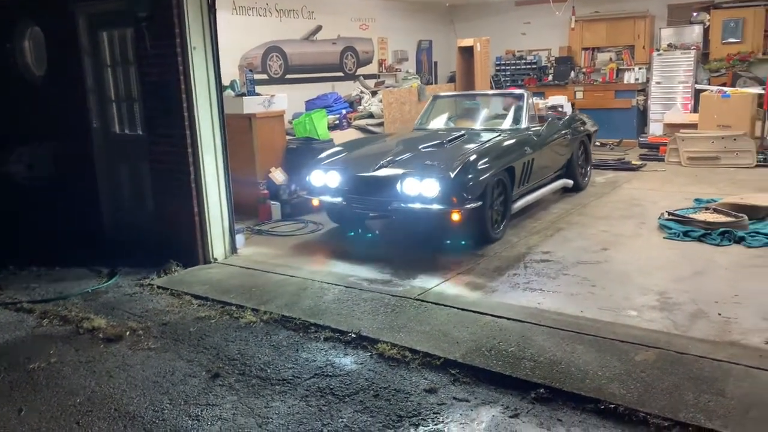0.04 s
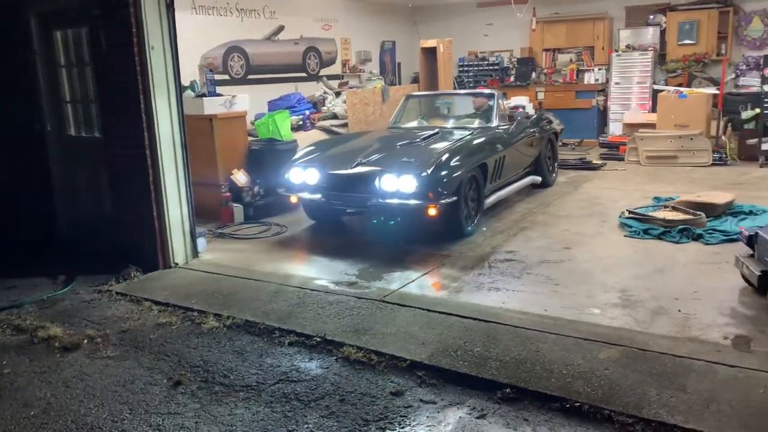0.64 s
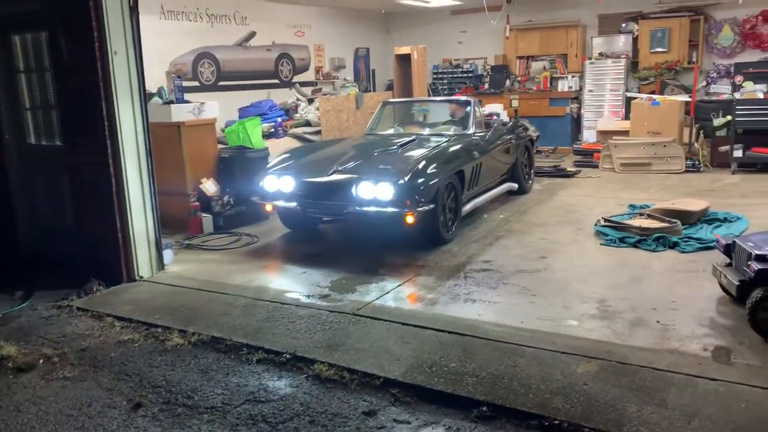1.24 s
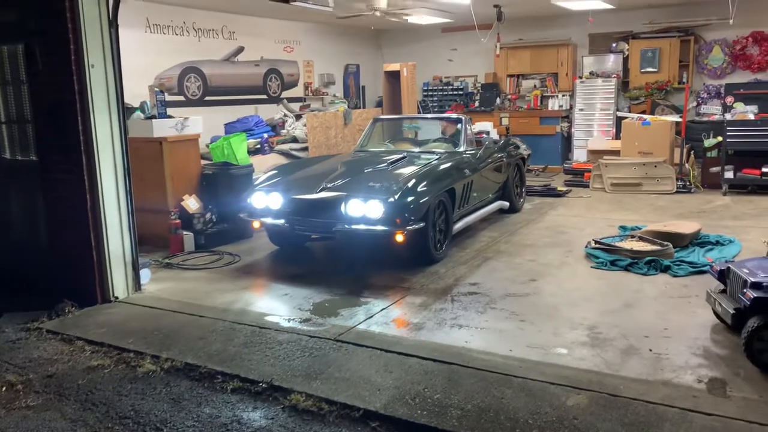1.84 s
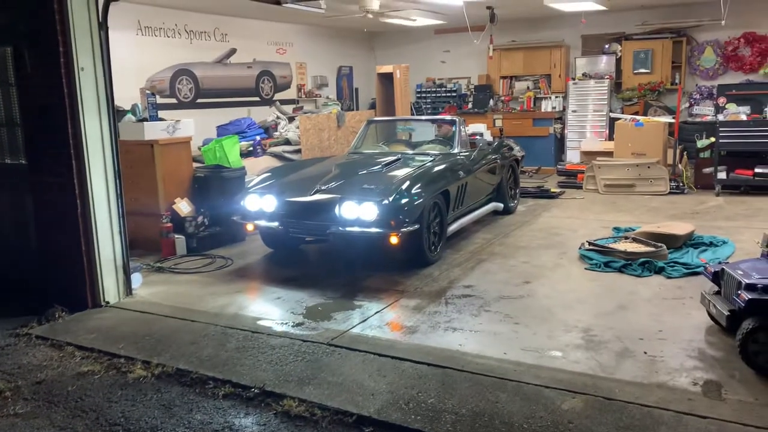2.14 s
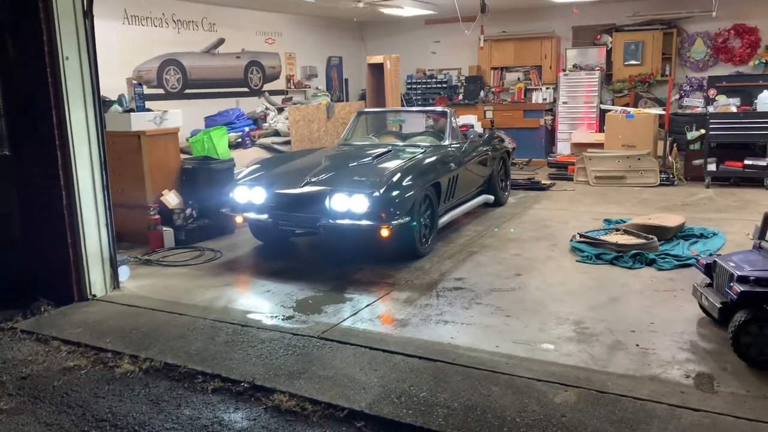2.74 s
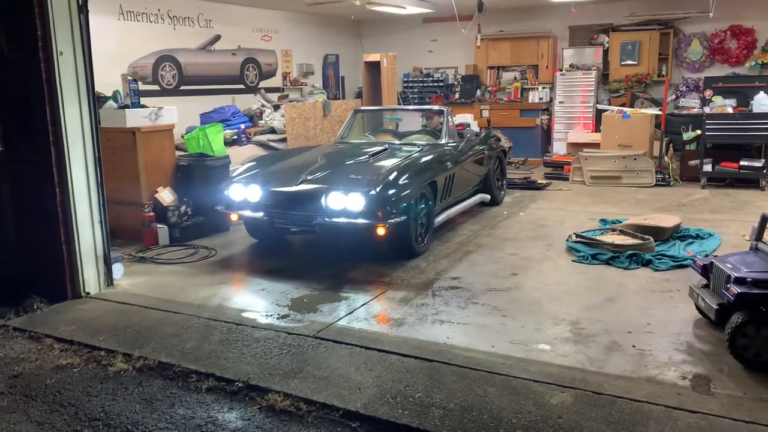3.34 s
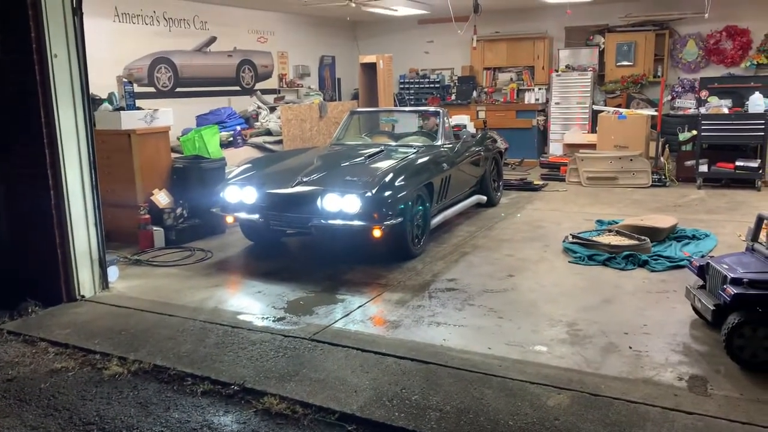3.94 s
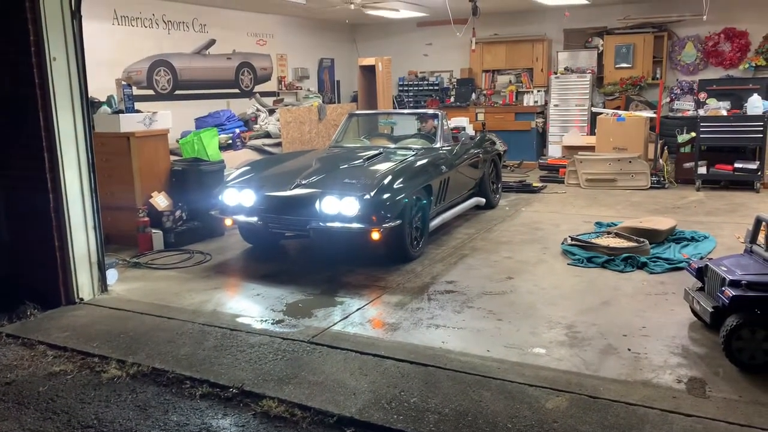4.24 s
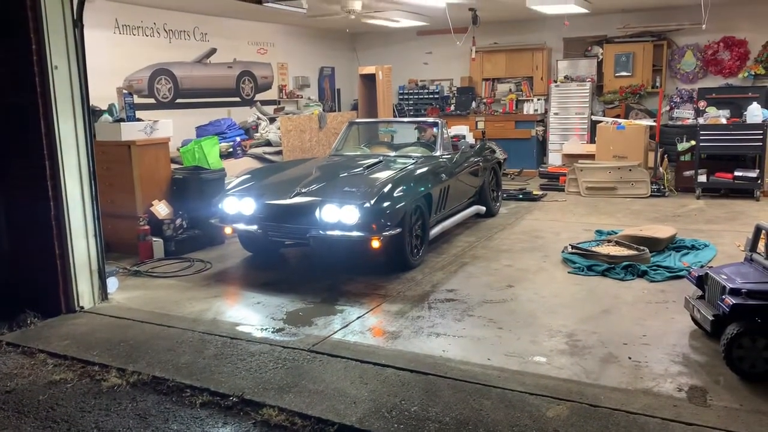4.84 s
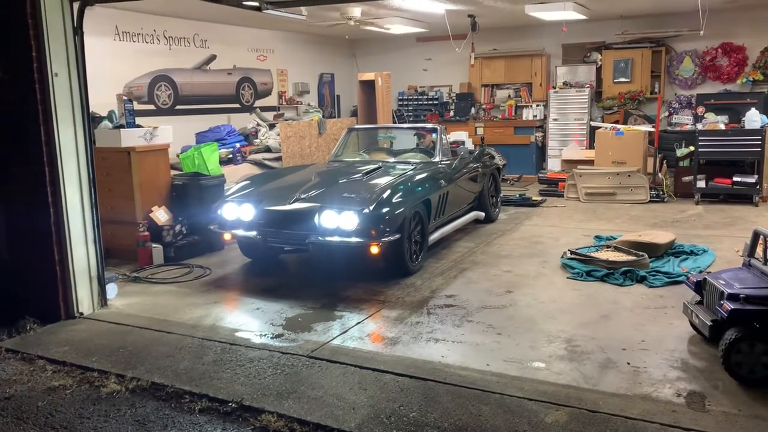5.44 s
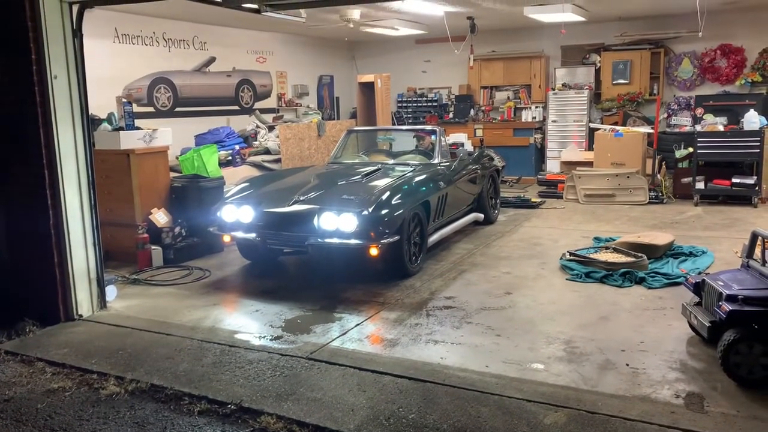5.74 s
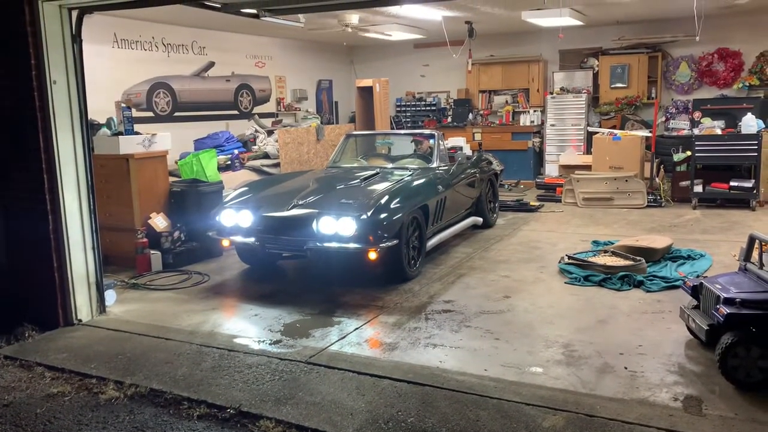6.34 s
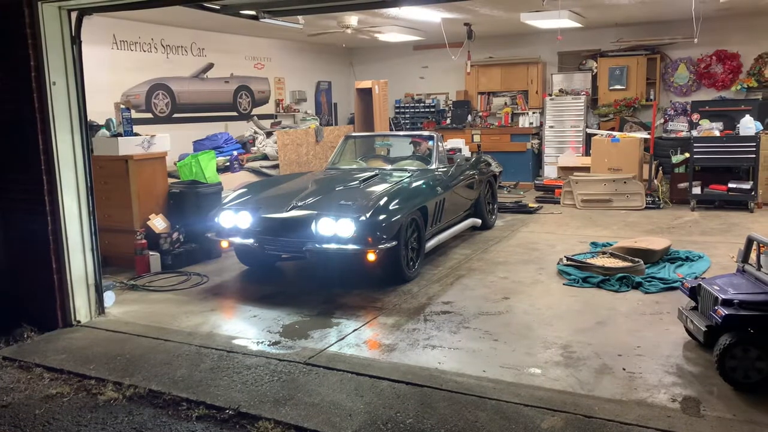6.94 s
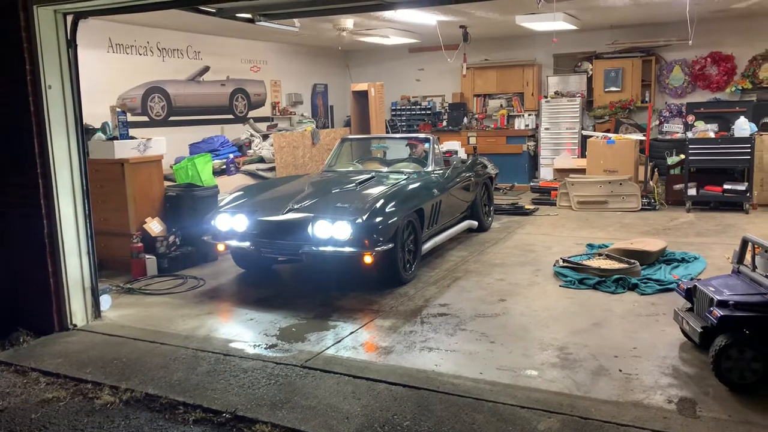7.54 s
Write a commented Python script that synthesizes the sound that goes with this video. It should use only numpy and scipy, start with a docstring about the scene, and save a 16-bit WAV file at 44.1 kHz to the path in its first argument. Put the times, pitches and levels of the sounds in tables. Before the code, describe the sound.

A V8 sports car runs throughout in an open garage, heard in stereo from the driveway. For the first four seconds it lopes at a hunting idle: deep, uneven exhaust thumps and heavy chugs, each with a puff of gas, broken by brief stumbles. Irregular pops and metallic knocks grow more frequent after one second. Faint, thin squeals, mostly falling, come and go between about 0.5 and 3 seconds. At about 4.3 seconds the throttle is blipped once and the pitch jumps, then sags until around 4.8 seconds. The engine picks up into a fast idle with a brighter drone and harder exhaust cracks. A second small push comes near 6.6 seconds, and the speed creeps up until the end at about 7.5 seconds. Light valve clatter and a low rumble sit underneath, with a short garage echo.

```python
"""V8 in an open garage

From the driveway, on a phone in stereo: a cross-plane V8 with side pipes lopes at
idle, is blipped once, then held at a fast idle. Each firing thumps in its bank's pipe, barks at the
outlet and spits a puff of gas; the hardest ones pop and knock. Valve clatter, faint squeals and a
low rumble sit underneath, and the garage rings behind it all."""
import sys
import numpy as np
from scipy import signal
from scipy.fft import rfft, irfft
from scipy.io import wavfile
from scipy.ndimage import uniform_filter1d

SR = 44100
rng = np.random.default_rng(int(sys.argv[2]) if len(sys.argv) > 2 else 0)


def int16_out(signal):
    """Quantize to a 16-bit WAV file."""
    q = np.round(np.clip(np.atleast_2d(signal).T, -1, 1) * 32767)
    wavfile.write(sys.argv[1], SR, q.astype(np.int16))


N = 334278
T = np.arange(N) / SR
RING_T = T[:SR // 5]  # time axis of one short ring or puff

# A hunting idle, a blip, a fast idle that creeps up. Each row: time in seconds, firings per second.
FIRING_RATE = [(0, 60.2), (.6, 70.1), (.95, 70), (1.3, 77.7), (1.6, 63.2), (1.95, 73.1), (2.62, 71.6),
               (2.9, 75.5), (4.04, 73.5), (4.27, 86), (4.37, 122), (4.46, 122), (4.78, 98), (5.8, 118.1),
               (6.42, 113.8), (6.85, 127), (7.58, 130.9)]
# The pedal: one blip, a hold, a second small push. Each row: time in seconds, opening from 0 to 1.
PEDAL = [(0, 0.28), (4.27, 0.38), (4.345, 1), (4.41, 0.22), (4.5, 0), (4.72, 0.66), (5.3, 0.64),
         (5.6, 0.46), (6.35, 0.41), (6.6, 0.72), (6.85, 0.54), (7.58, 0.53)]
# The pipe each cylinder fires into, in firing order: 0 is near the microphone, 1 is far.
CYLINDER_BANK = [0, 1, 1, 0, 1, 0, 0, 1]
# Relative strength of each cylinder in dB, in firing order.
CYLINDER_STRENGTH_DB = [5, 11, 13, 6.5, -23, 1, 4, -22]
# The engine stumbles on a light pedal. Each row: time in seconds, scatter of the thumps in dB.
THUMP_SCATTER = [(0, 1.5), (4.2, 1.5), (4.35, 1), (4.7, 2), (5.4, 3), (5.7, 6), (6.45, 6), (6.65, 1.5),
                 (7.58, 1.5)]
# The mixture fails to burn; the longest lull is the overrun after the blip.
# Each row: start in seconds, length in seconds, depth in dB that the combustion sinks towards.
MISFIRE_LULLS = [(0.117, 0.14, 3), (0.362, 0.11, 16), (0.67, 0.069, 7), (1.133, 0.065, 4),
                 (1.666, 0.036, 14), (2.053, 0.088, 9.5), (2.274, 0.11, 12), (2.443, 0.054, 17),
                 (2.621, 0.097, 16), (3.022, 0.054, 11), (3.092, 0.063, 11), (3.23, 0.099, 10),
                 (3.414, 0.13, 6.5), (3.602, 0.085, 15), (3.81, 0.062, 12), (4.015, 0.027, 14),
                 (4.429, 0.24, 9), (4.692, 0.1, 7.5), (5.103, 0.095, 8.5), (5.29, 0.051, 9.5),
                 (5.565, 0.053, 11.5)]
# Deep resonances of pipes and garage. Each row: pitch in Hz, width in Hz, gain in dB.
BOOM_MODES = [(63, 12, -14), (80, 14, -15), (100, 12, 2.5), (121, 13, 1)]
# Broad tone of the thump. Each row: frequency in Hz, gain in dB.
THUMP_SPECTRUM = [(20, -25), (48, -16.5), (70, -6), (100, 1), (128, 0), (145, -7), (400, -22), (1000, -36)]
# The boom swells as the firings meet its resonances. Each row: time in seconds, base level in dB.
BOOM_SWELL = [(0, -21.5), (.92, -15), (1.55, -18), (3.25, -15.5), (4.1, -17), (4.4, -12.5), (5.25, -13.5),
              (5.95, -14), (6.46, -17), (6.66, -11), (7.58, -14)]
# The boom dips briefly. Each row: centre in seconds, depth in dB.
BOOM_DROPS = [(.72, 13), (1.53, 15), (2.51, 11), (4.545, 15), (4.805, 7), (5.6, 12)]
# The heaviest chugs of the idle. Each row: crest in seconds, level in dB.
HEAVY_CHUGS = [(0.282, -11), (.531, -9), (0.584, -12), (.621, -8), (0.669, -10.5), (0.89, -9.5),
               (0.921, -7), (1.065, -8), (1.246, -9), (1.416, -8.5), (1.455, -7.5), (1.573, -11.5),
               (1.778, -11), (1.821, -10.5), (1.936, -11), (2.087, -11.5), (2.223, -7.5), (2.268, -8),
               (2.463, -8), (2.599, -8), (2.814, -5.5), (2.923, -6.5), (3.072, -9), (3.242, -5),
               (3.457, -9.5), (3.567, -11), (3.74, -8), (3.783, -9.5), (3.93, -11), (4.107, -8), (4.2, -7)]
# Higher pipe resonances that come up with the throttle. Each row: pitch in Hz, width in Hz, gain in dB.
DRONE_MODES = [(163, 16, 2), (191, 13, 4), (207, 9, 1.5), (245, 13, -2.5), (282, 14, -7), (301, 10, -.5),
               (323, 11, -5.5)]
# Resonances at the pipe outlets. Each row: pitch in Hz, width in Hz, gain in dB.
OUTLET_MODES = [(460, 28, 2.5), (565, 34, -5), (640, 70, -3.5), (790, 62, 0), (1025, 55, -6),
                (1310, 170, -5), (1870, 80, -8), (2050, 45, -7)]
# Broad tone of the outlets. Each row: frequency in Hz, gain in dB.
OUTLET_SPECTRUM = [(150, -71), (380, -30), (900, -10.5), (1600, -36.5), (3000, -100.5), (8000, -26)]
# Tone of the escaping gas. Each row: frequency in Hz, gain in dB.
GAS_SPECTRUM = [(300, -38.5), (1000, 5), (1600, -5.5), (2600, 2.5), (3500, 2.5), (4300, 0), (5400, -5),
                (6800, 3.5), (8600, -2.5), (11000, 3.5), (14000, -6.5), (16000, -5)]
# Hard firings. Each row: start in seconds, then relative levels in dB of gas, outlet crack, metal knock.
HARD_FIRINGS = [(0.125, -33, -32, -33), (.446, -34.5, -43, -37), (0.569, -37, -39, -46),
                (1.085, -31, -29, -28.5), (1.227, -28, -37, -35), (1.259, -47, -26, -44),
                (1.399, -30, -28, -27.5), (1.606, -34, -26, -27), (1.633, -31, -22.5, -34),
                (1.729, -36, -35, -38), (1.877, -44, -25, -28.5), (2.026, -31, -35, -26),
                (2.066, -30, -28, -29), (2.213, -28, -21.5, -21.5), (2.358, -30, -31, -37),
                (2.396, -30, -26, -30), (2.448, -28, -43, -37), (2.54, -25.5, -21, -32),
                (2.578, -28, -26, -27), (2.729, -36, -43, -30.5), (2.767, -30.5, -22, -44),
                (2.795, -27.5, -40, -29), (2.865, -40, -47, -27.5), (2.98, -48, -37, -38),
                (3.007, -48, -47, -33), (3.092, -32, -45, -25.5), (3.156, -33, -43, -37),
                (3.195, -36, -44, -29.5), (3.334, -34, -39, -25), (3.407, -32, -26, -24),
                (3.546, -32, -29, -38), (3.595, -33, -30, -34), (3.729, -29, -26, -26),
                (3.762, -32, -35, -27), (3.981, -26, -31, -33), (4.046, -29, -28, -22.5),
                (4.086, -52, -40, -37), (4.241, -32, -29, -25), (4.312, -26.5, -26, -41),
                (4.357, -26, -18.5, -36), (4.395, -31, -19.5, -50), (4.68, -35, -17.5, -47),
                (4.834, -26.5, -20, -26), (4.92, -33, -22, -24), (5.064, -28, -16, -28.5),
                (5.147, -33, -31, -27), (5.225, -29.5, -18, -43), (5.486, -30, -21, -38),
                (5.525, -33, -15, -26.5), (5.63, -32, -28, -30), (5.691, -31, -19, -24.5),
                (5.716, -49, -27, -39), (5.788, -48, -27, -34), (5.881, -29.5, -19, -34),
                (5.923, -35, -19, -28), (6.056, -30.5, -13.5, -26), (6.11, -34, -25, -34),
                (6.179, -42, -29, -30), (6.293, -36, -19, -32), (6.399, -30, -21, -31),
                (6.479, -45, -41, -33), (6.523, -36, -26, -36), (6.552, -29.5, -17.5, -27),
                (6.595, -31, -17, -29), (6.655, -36, -29, -25), (6.744, -46, -38, -31),
                (6.785, -32, -24, -48), (6.841, -30, -32, -28), (6.992, -38, -28, -31),
                (7.309, -33, -24, -28.5)]
# Ring of the engine's metal. Each row: pitch in Hz, width in Hz, gain in dB.
METAL_MODES = [(1880, 55, -6), (2055, 45, -5), (2402, 50, -7.5), (3290, 90, -3), (3420, 65, 3.5),
               (3590, 70, 2.5), (3765, 75, .5), (3895, 65, -2)]
# Faint squeals, most of them falling.
# Each row: start in seconds, length in seconds, first pitch in Hz, last pitch in Hz, relative dB.
SQUEALS = [(.545, .06, 1370, 1270, -36), (.83, .27, 1230, 1100, -41), (1.32, .24, 1040, 1110, -44),
           (1.68, .18, 1310, 1280, -42), (1.79, .21, 1275, 1095, -37.5), (2.02, .09, 1070, 1050, -38),
           (2.955, .06, 1040, 1010, -34)]
# Tone of the background rumble. Each row: frequency in Hz, gain in dB.
RUMBLE_SPECTRUM = [(15, -26), (28, -23), (44, -15), (68, -3), (120, -5), (300, -17), (1000, -30),
                   (4000, -48), (16000, -68)]
# Tone of the echoes that spread left and right. Each row: frequency in Hz, gain in dB.
SIDE_SPECTRUM = [(60, -19), (130, -22.5), (300, -15.5), (650, -11.5), (1100, -8), (1400, -4.5),
                 (3400, -2.5), (5000, -2), (6800, -1), (8500, -37), (11000, -4), (15000, -20)]
# Stepped left-right phase shift that spreads the treble in stereo.
# Each row: frequency in Hz, lead of the left channel in radians.
TREBLE_PHASE = [(0, 0), (6400, 0), (7500, -1.4), (8200, -3), (8900, -3.3), (10500, -6.2), (11400, -6.4),
                (13000, -9.3), (13900, -9.6), (15200, -12.5)]

# How each voice answers the engine. Each law: base level in dB, dB added at full throttle,
# dB per doubling of speed, share of a lull's depth.
DRONE_LAW, BARK_LAW = (-27, 5.5, 11, 0.75), (-39.5, 12, 6, 1.45)
GAS_LAW, CLATTER_LAW = (-30, 10, -3, 1.18), (-42, 10.5, 1.5, 1.05)
IDLE_HZ, POP_RISE_S = 72, .0025


def firings(rate, jitter_s=0.00038, far_lag_s=0.0008, far_db=-14):
    """Times, strengths and unevenness of the firings; the far pipe is later and weaker, idle roughest."""
    count = np.cumsum(rate) / SR + 2.5  # starts partway through the firing order
    index = np.arange(np.ceil(count[0]), count[-1]).astype(int)
    times = np.interp(index, count, T)
    cylinder = index % len(CYLINDER_BANK)
    far = np.array(CYLINDER_BANK)[cylinder]
    uneven = rate.min() / np.interp(times, T, rate)
    times = times + far * far_lag_s + jitter_s * uneven * rng.standard_normal(len(index))
    sizes = amp(np.array(CYLINDER_STRENGTH_DB)[cylinder] + far * far_db)
    return times, sizes, uneven


def thump(times, sizes, late_s_per_db=.0002):
    """Pressure pulses boom in pipes and garage; the uneven spacing within a bank makes the lope."""
    scatter_db = np.interp(times, *np.transpose(THUMP_SCATTER))
    luck_db = scatter_db * np.clip(rng.standard_normal(len(times)), -2, 2)
    pulses = strike(times - late_s_per_db * luck_db, sizes * amp(luck_db))  # a weak firing burns late
    return steady(colour(ring(pulses, BOOM_MODES), THUMP_SPECTRUM), span_s=.09)


def boom_dips(half_width_s=0.026):
    """The dB by which the boom briefly dips."""
    return sum(depth_db * np.exp(-((T - at) / half_width_s) ** 2) for at, depth_db in BOOM_DROPS)


def chugs(boom_hz=103, throat_hz=195, throat_db=-11, rise_s=.01, sag_db=8, sag_s=.024):
    """Heavy firings ring near the main resonance; also gives the dB by which thumps around them sag."""
    out, nearness = np.zeros(N), np.zeros(N)
    swell = RING_T / rise_s * np.exp(1 - RING_T / rise_s)
    for crest, db in HEAVY_CHUGS:
        pitches = np.array([boom_hz, throat_hz]) * (1 + .05 * rng.standard_normal(2))
        boom, throat = (np.sin(2 * np.pi * hz * RING_T) for hz in pitches)
        first = int((crest - rise_s) * SR)
        out[first:first + len(RING_T)] += amp(db) * swell * (boom + amp(throat_db) * throat)
        nearness = np.maximum(nearness, np.exp(-((T - crest + rise_s / 2) / sag_s) ** 2))
    return out, sag_db * nearness


def drone(times, sizes, uneven, rate, scatter_db=15.0, jitter_s=.0008, rasp=0.08, brighten_db=5.4):
    """The pulses ring the pipes' higher modes: ragged and dull at idle, a clean, bright chord at speed."""
    ragged = uneven ** 3
    time_luck, size_luck = rng.standard_normal((len(times), 2)).T * ragged
    times = times + jitter_s * time_luck
    sizes = sizes * amp(scatter_db * size_luck)
    drive = strike(times, sizes) + rasp * puff(strike(times, sizes * ragged), decay_s=0.037)
    tilt_db_per_octave = brighten_db * np.log2(rate / IDLE_HZ)
    chord = np.zeros(N)
    for mode in DRONE_MODES:
        octaves_up = np.log2(mode[0] / DRONE_MODES[0][0])
        chord += ring(drive, [mode]) * amp(tilt_db_per_octave * octaves_up)
    return steady(passband(chord, hz=[140, 335], order=4), span_s=0.08)


def bark(times, sizes, uneven, scatter_db=10.0, rasp=0.18):
    """The steep front of each pulse and its turbulence ring the outlets."""
    luck_db = scatter_db * uneven * rng.standard_normal(len(times))
    pulses = strike(times, sizes ** 0.42 * amp(luck_db))  # echoes even out the two banks
    return steady(outlet(pulses + rasp * puff(pulses, decay_s=0.0058)), span_s=0.039)


def outlet(drive):
    """The ring and dull, broad bark of the pipe outlets; neighbouring modes swing oppositely."""
    ringing = ring(drive, OUTLET_MODES[1::2]) - ring(drive, OUTLET_MODES[::2])
    return passband(ringing + colour(drive, OUTLET_SPECTRUM), hz=2300, kind="low", order=3)


def spit(times, sizes, uneven, scatter_db=5.5, band_scatter_db=4.5):
    """A puff of gas after every firing, of unequal strength; some are dull, some hiss, some sizzle."""
    luck, *band_lucks = rng.standard_normal((len(times), 4)).T * uneven
    strength = sizes ** 0.35 * amp(scatter_db * luck)
    gas = np.zeros(N)
    for band_hz, band_luck in zip([(200, 3000), (3000, 7000), (7000, 18000)], band_lucks):
        pulses = strike(times, strength * amp(band_scatter_db * band_luck))
        gas += passband(puff(pulses, decay_s=.022, rise_s=0.0061), band_hz)
    return steady(gas, span_s=0.069)


def pops(burst_gain_db=13.0, crack_gain_db=20, knock_gain_db=20):
    """Hard firings: a burst of gas, a throaty crack in the outlet and a knock in the metal."""
    times, gas_db, crack_db, metal_db = np.transpose(HARD_FIRINGS)
    burst = puff(strike(times, amp(gas_db + burst_gain_db)), decay_s=0.014, rise_s=POP_RISE_S)
    blast = puff(strike(times, amp(crack_db + crack_gain_db)), decay_s=.009)
    crack = passband(outlet(blast), hz=1400, kind="low")
    knock = clink(times + POP_RISE_S, amp(metal_db + knock_gain_db), chatter_s=.012, scatter_db=3)
    return burst, crack, knock


def surge(length_s=0.061):
    """A brief swell of pressure behind each hard firing, 1 for the hardest crack."""
    times, _, crack_db, _ = np.transpose(HARD_FIRINGS)
    swell = np.sin(np.pi * np.minimum(T[:SR] / length_s, 1))
    return through(strike(times, amp(crack_db - crack_db.max())), swell)


def puff(pulses, decay_s, rise_s=0.0012):
    """Turbulent gas builds and dies away after each impulse."""
    envelope = np.exp(-RING_T / decay_s) * (1 - np.exp(-RING_T / rise_s))
    return through(pulses, envelope) * rng.standard_normal(N)


def effort(law, rate, lull_db, lag_s=0):
    """Gain of a voice: up with the throttle, shifted by speed, down in a misfire."""
    base_db, throttle_db, doubling_db, lull_share = law
    opening = np.interp(T - lag_s, T, curve(PEDAL))
    speed_db = doubling_db * np.log2(rate / IDLE_HZ)
    return amp(base_db + throttle_db * opening + speed_db - lull_share * lull_db)


def misfires(fade_s=0.071, catch_s=.007):
    """The dB lost in each lull: the gas dies away slowly, then the combustion catches at once."""
    lull_db = np.zeros(N)
    for start, length, depth_db in MISFIRE_LULLS:
        span = slice(*np.searchsorted(T, [start, start + length + catch_s]))
        age = T[span] - start
        unlit = np.clip((length - age) / catch_s + .5, 0, 1)
        lull_db[span] += depth_db * (1 - np.exp(-age / fade_s)) * unlit
    return lull_db


def wander(spread_db=1.12):
    """The dB by which combustion drifts from one engine cycle to the next."""
    drift = passband(rng.standard_normal(N), hz=[3, 9])
    return spread_db * drift / drift.std()


def valve_clatter(times, sizes, lag_s=0.0042):
    """One light clink per firing, a little harder for the strong cylinders."""
    return steady(clink(times + lag_s, sizes ** 0.058, chatter_s=0.007, scatter_db=7), span_s=0.12)


def clink(times, sizes, chatter_s, scatter_db, bounces_per_s=300, first_blow=.7):
    """Metal is struck, bounces a few times and rings; every blow favours other modes."""
    lucks = rng.uniform(-1, 1, (len(times), len(METAL_MODES))).T
    bounces = (rng.random(N) < bounces_per_s / SR) * np.sign(rng.standard_normal(N))
    chatter = np.exp(-RING_T / chatter_s) * (1 - np.exp(-RING_T / POP_RISE_S))
    rings = []
    for mode, luck in zip(METAL_MODES, lucks):
        blows = strike(times, sizes * amp(scatter_db * luck))
        rings.append(ring(first_blow * blows + through(blows, chatter) * bounces, [mode]))
    metal = sum(rings[::2]) - sum(rings[1::2])  # neighbouring modes swing oppositely
    return metal * np.sqrt(SR / bounces_per_s)


def squeals(waver=0.012):
    """Thin, wavering tones swell and fade as they glide in pitch."""
    out = np.zeros(N)
    for start, length, start_hz, end_hz, db in SQUEALS:
        progress = np.clip((T - start) / length, 0, 1)
        wobble = steady(colour(rng.standard_normal(N), [(60, -6), (300, -36)]), span_s=0.51)
        hz = (start_hz + (end_hz - start_hz) * progress) * (1 + waver * wobble)
        swell = 2 * np.sin(np.pi * progress) ** 2
        out += amp(db) * swell * np.sin(2 * np.pi * np.cumsum(hz) / SR)
    return out


def garage(x, t60_s, gap_s=0.0033):
    """Dense echoes come back from the walls and clutter."""
    tail = rng.standard_normal(SR) * amp(-60 * T[:SR] / t60_s) * (T[:SR] > gap_s)
    return through(x, tail / np.linalg.norm(tail))


def background_rumble(level_db=-22.0):
    """An even, low noise lies under the engine."""
    return amp(level_db) * steady(colour(rng.standard_normal(N), RUMBLE_SPECTRUM), span_s=0.9)


def amp(db):
    """Decibels to gain."""
    return np.exp(np.asarray(db) * np.log(10) / 20)


def curve(rows):
    """Rows of time and value, joined by straight lines."""
    return np.interp(T, *np.transpose(rows))


def strike(times, sizes):
    """One impulse at each time."""
    return np.bincount(np.clip(times * SR, 0, N).astype(int), sizes, N + 1)[:N]


def through(x, response):
    """The sound after a linear response, cut where that has died away."""
    audible = np.flatnonzero(np.abs(response) >= 1e-6 * np.abs(response).max())
    return signal.oaconvolve(x, response[:audible[-1] + 1])[:N]


def passband(x, hz, kind="band", order=2):
    """Keeps a band, or with kind "low" everything below one frequency."""
    return signal.sosfilt(signal.butter(order, hz, kind, fs=SR, output="sos"), x)


def colour(x, points, size=8192):
    """Causal filter whose spectrum follows rows of frequency in Hz and gain in dB."""
    hz, db = np.transpose(points)
    gain = amp(np.interp(np.log(np.fft.rfftfreq(size, 1 / SR) + 1), np.log(hz), db))
    cepstrum = irfft(np.log(gain))
    cepstrum[1:size // 2] *= 2  # fold onto positive time for minimum phase
    cepstrum[size // 2 + 1:] = 0
    return through(x, irfft(np.exp(rfft(cepstrum))))


def ring(x, modes):
    """Damped resonances; the wider a mode, the sooner it dies."""
    response = np.zeros(len(RING_T))
    for hz, width_hz, db in modes:
        decay = 2 * np.pi * width_hz / SR * np.exp(-np.pi * width_hz * RING_T)
        response += amp(db) * decay * np.cos(2 * np.pi * hz * RING_T)
    return through(x, response)


def steady(x, span_s):
    """Unit level over span_s; faster throbs stay."""
    span = int(span_s * SR)
    power = uniform_filter1d(uniform_filter1d(x * x, span), span)
    return x / np.sqrt(power + 1e-14)


def scene(boom_lull_share=0.11, pipe_fill_s=0.024, drone_surge_db=3.0, bark_surge_db=1.0):
    """From the driveway: exhaust, gas and valves follow one crankshaft; the garage rings behind them."""
    rate = curve(FIRING_RATE)
    lull_db = misfires() + wander()
    push = surge()
    times, sizes, uneven = firings(rate)
    burst, crack, knock = pops()
    gas = spit(times, sizes, uneven) * effort(GAS_LAW, rate, lull_db) + burst
    valves = valve_clatter(times, sizes) * effort(CLATTER_LAW, rate, lull_db)
    treble = amp(-2.5) * colour(gas, GAS_SPECTRUM) + valves + knock

    boom = thump(times, sizes)
    chugging, sag_db = chugs()
    boom_gain = amp(curve(BOOM_SWELL) - boom_lull_share * lull_db - boom_dips() - sag_db)
    drone_gain = effort(DRONE_LAW, rate, lull_db, lag_s=pipe_fill_s) * amp(drone_surge_db * push)
    low = boom * boom_gain + chugging + drone(times, sizes, uneven, rate) * drone_gain
    bark_gain = effort(BARK_LAW, rate, lull_db) * amp(bark_surge_db * push)
    mid = bark(times, sizes, uneven) * bark_gain + crack

    squealing, rumble = squeals(), background_rumble()
    echoes = garage(amp(-4.5) * mid + amp(-7) * treble, t60_s=.18)
    centre = low + mid + squealing + treble + rumble + echoes
    # the deep boom stays near the centre; echoes of the rest spread wide
    side_echoes = garage(amp(-1.0) * low + mid + squealing + treble + amp(3.5) * rumble, t60_s=0.12)
    side = colour(side_echoes, SIDE_SPECTRUM)
    return np.array([centre + side, centre - side])


def record(dry, balance_db=-.9, top_hz=15800):
    """A stepped left-right phase shift spreads the treble in stereo; the phone clips and cuts the top."""
    lead = np.interp(np.fft.rfftfreq(N, 1 / SR), *np.transpose(TREBLE_PHASE))
    halves = np.array([[.5], [-.5]])  # left and right each take half of the phase and balance
    heard = irfft(rfft(dry) * np.exp(1j * halves * lead), N) * amp(halves * balance_db)
    top_cut = signal.ellip(10, .2, 80, top_hz, fs=SR, output="sos")
    return signal.sosfilt(top_cut, np.clip(heard, -1, 1))


dry = scene()
out = record(dry)
int16_out(out)
```